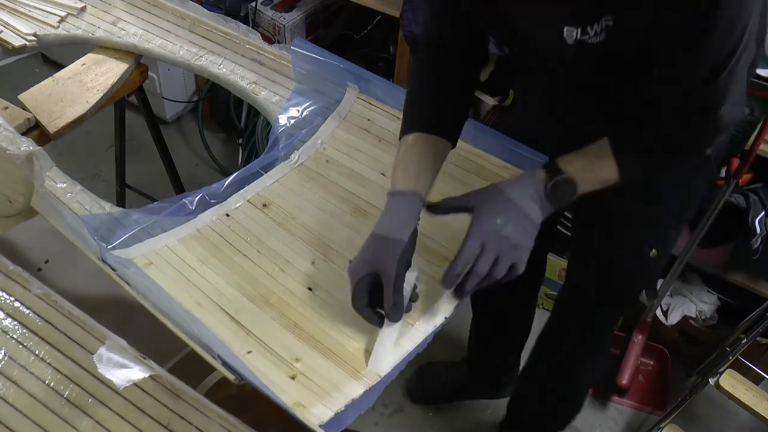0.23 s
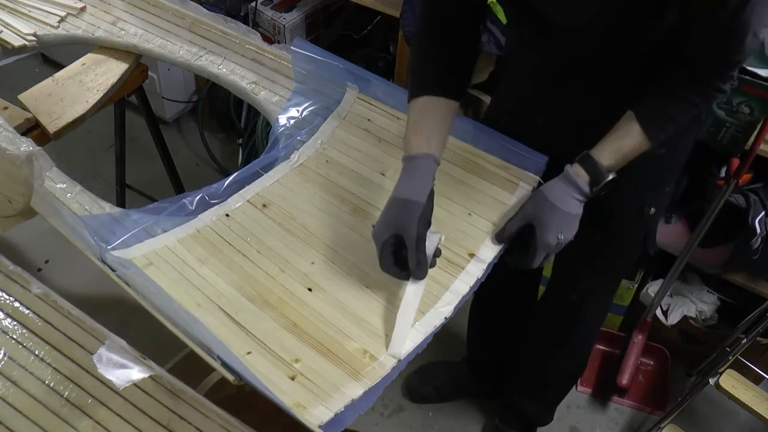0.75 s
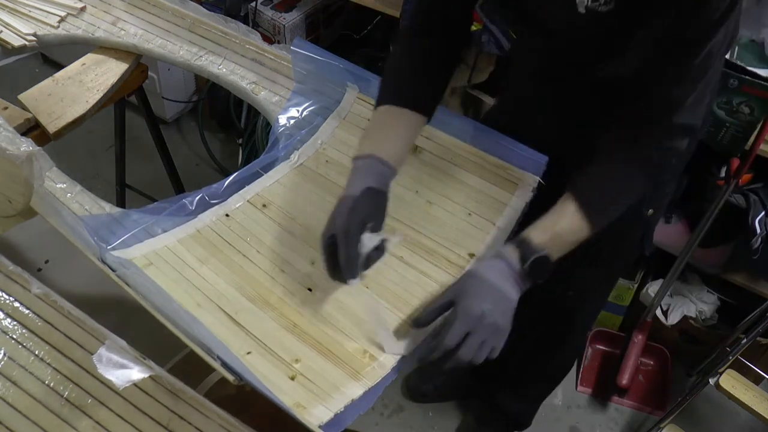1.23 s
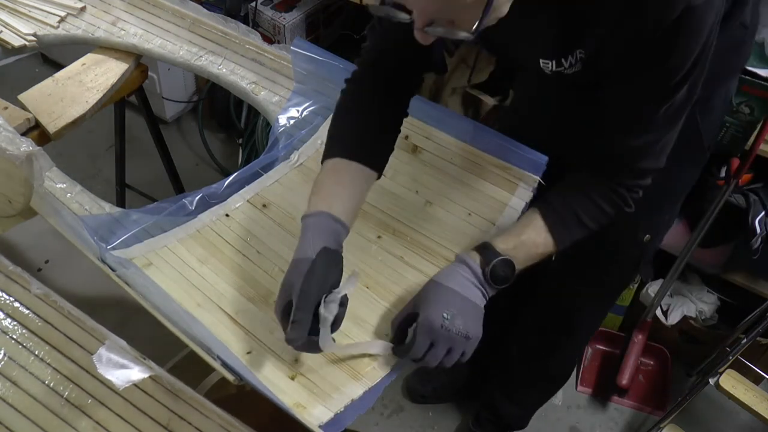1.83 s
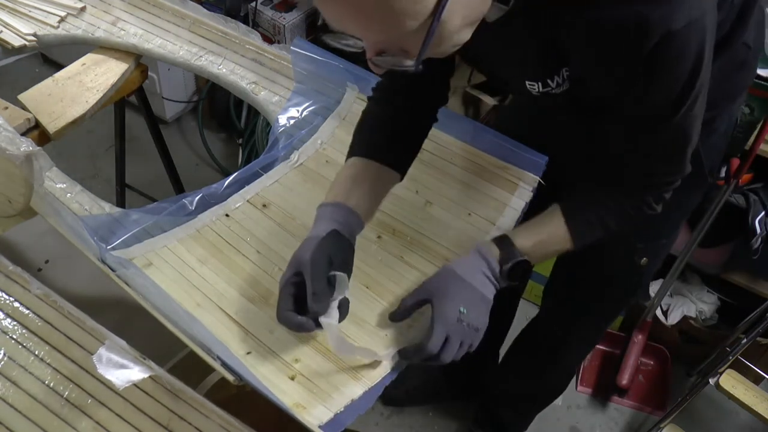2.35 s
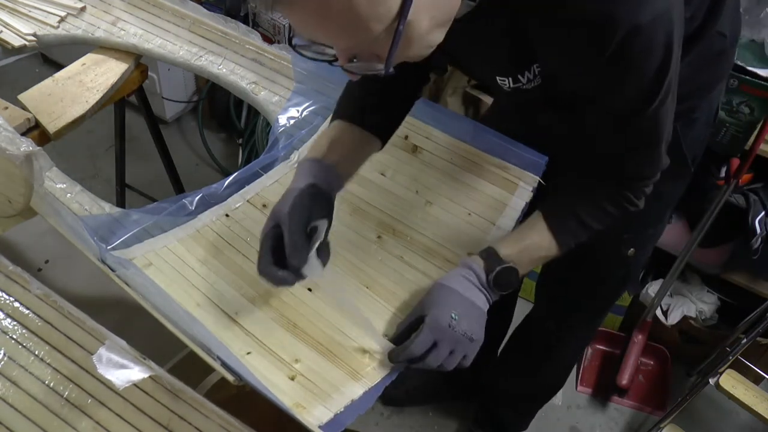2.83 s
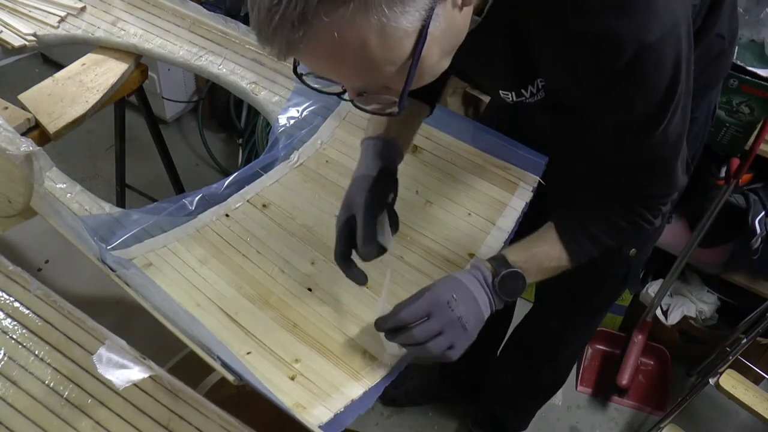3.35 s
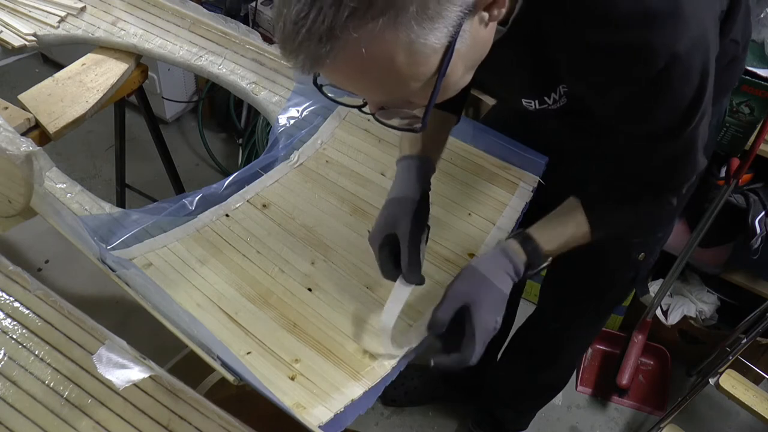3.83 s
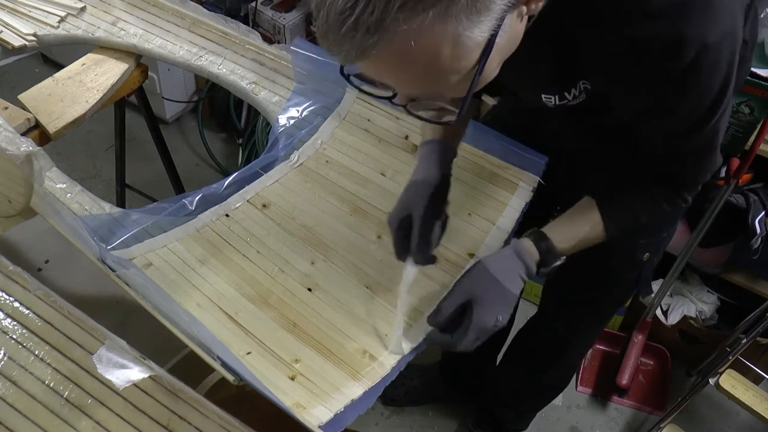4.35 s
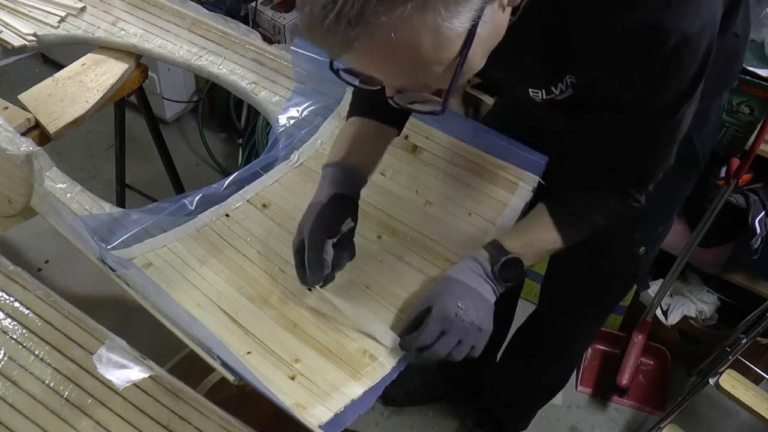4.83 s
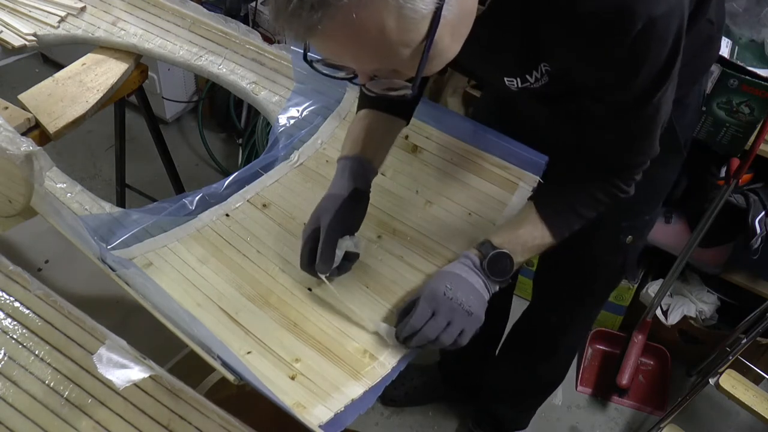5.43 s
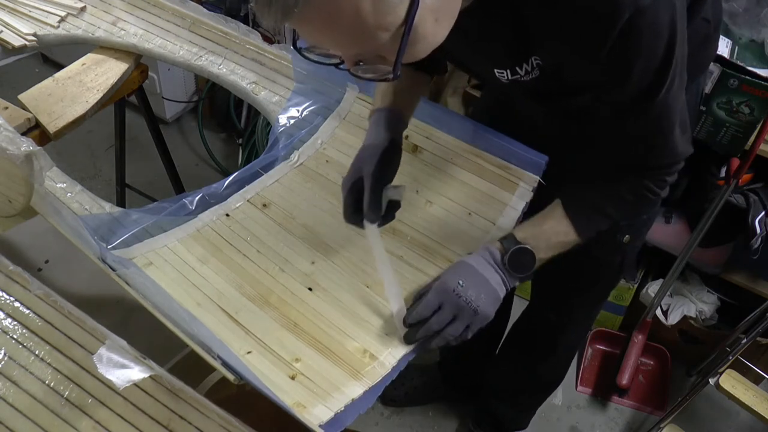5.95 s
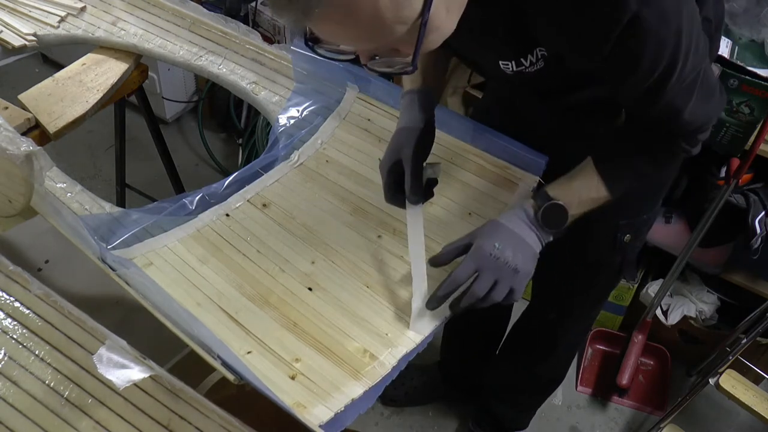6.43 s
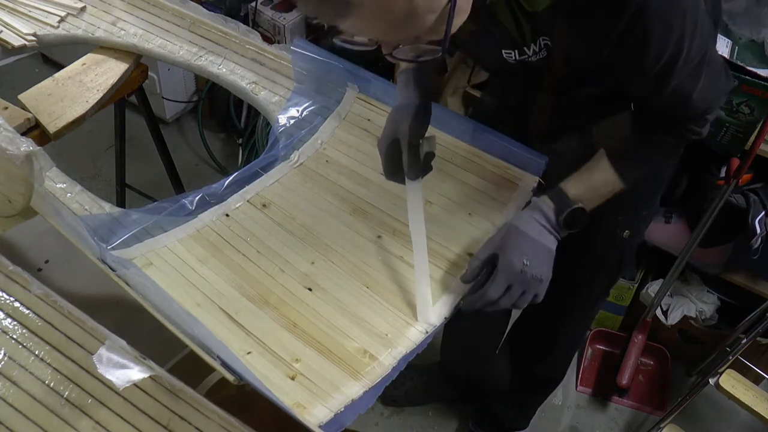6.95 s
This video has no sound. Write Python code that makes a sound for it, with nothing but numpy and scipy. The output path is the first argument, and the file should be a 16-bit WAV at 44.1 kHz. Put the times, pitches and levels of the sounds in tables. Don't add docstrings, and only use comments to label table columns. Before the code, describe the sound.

Dry, bright tape tearing at medium-close range: a jerk and one strong rip, then irregular short rasps, ticks and crinkles with quieter gaps. Sharp snaps break through in the later part. Dull wooden scrapes and thumps accompany the handling. A close bench reflection and short room tail surround everything, with low mains and motor hum and soft, nearly centred hiss.

```python
import sys
import numpy as np
from scipy import signal
from scipy.fft import rfft, irfft
from scipy.io import wavfile
from scipy.ndimage import uniform_filter1d

SR = 44100
rng = np.random.default_rng(int(sys.argv[2]) if len(sys.argv) > 2 else 0)


def rack_gain(trim_db):
    fader = np.asarray(trim_db, float)
    return 10 ** (fader / 20)


def store_wav(level_fs):
    pcm = np.round(np.clip(np.atleast_2d(level_fs), -1, 1) * 32767)
    wavfile.write(sys.argv[1], SR, pcm.T.astype(np.int16))


N = 317079

# start_s, long_tape_db, tautness_db
RIP = [
    (0, -74, -10),
    (0.044, -53, -12),
    (0.052, -43, 1),
    (0.094, -31, -1.5),
    (0.158, -25, 0.5),
    (0.28, -29.5, 4),
    (0.34, -37.5, 3),
    (0.45, -59.5, -0.5),
    (0.6, -81, 1.5),
]
# start_s, long_tape_db, tautness_db
CREEP = [(0, -52, 6), (0.75, -54, 1), (0.89, -66.5, -12), (1.15, -64, -4), (1.6, -60.5, -7),
         (1.95, -58.5, -7), (2.4, -54, -1), (2.62, -61.5, -8), (3.1, -64, -5), (3.5, -68, -2),
         (3.8, -65, -12), (3.95, -82, -8), (4.3, -70, -3), (4.6, -60.5, 1), (5.0, -61, 0.5),
         (5.55, -57, -2), (5.9, -61.5, -4), (6.3, -60, 6), (6.77, -69, -8)]
# peak_s, long_tape_db, rise_s (per 20 dB), fall_s (per 20 dB), tautness_db
SWELLS = [(0.535, -50.5, 0.2, 0.03, 3.5), (0.79, -52.5, 0.5, 0.1, -3.5), (1.004, -48.5, 0.09, 0.09, -1.5),
          (1.228, -40.5, 0.0148, 0.0747, 0.5), (1.45, -51, 0.07, 0.07, -2.5), (1.56, -56.5, 0.15, 0.16, 0),
          (1.748, -46.5, 0.0456, 0.02, 3.5), (1.69, -54, -0.02, 0.18, 6.5), (1.905, -58, -0.04, 0.02, 3),
          (5.15, -48.5, 0.08, .06, -2), (5.27, -52.5, 0.02, 0.16, -2.5), (3.175, -50, -0.02, 0.03, -8),
          (2.81, -61.5, .05, .1, -2), (2.11, -46, 0.12, 0.2, -4), (2.225, -40.5, 0.06, 0.1169, 3),
          (2.345, -57.5, -0.1, 0.15, 4), (2.446, -41.5, -0.18, 0.0829, -1.5),
          (2.804, -58.5, 0.07, 0.08, -1.5), (3.09, -59.5, -0.34, 0.1, -1.5), (3.387, -50, 0, 0.03, -4.5),
          (3.6, -55.5, 0.09, 0.2, -1), (3.674, -53.5, 0, 0.03, 11), (4.2, -49, -0.03, 0, 3),
          (4.73, -46.5, 0.0644, 0.06, -1.5), (5.065, -52, 0.09, 0.08, 1.5), (5.335, -50.5, 0.09, 0.13, -5),
          (6.25, -49.5, 0.06, -1, 6), (6.42, -51.5, 0.21, 0.29, 2), (6.9, -61, 0.1, -1.5, 1.5),
          (7.17, -48.5, 0.23, -2, 1)]
# start_s, long_tape_db, fall_s (per 20 dB), tautness_db
JERKS = [(0.0, -27, 0, -5.5), (0.553, -42.5, 0.04, 6), (0.575, -51, 0.1, 8), (1.2, -45.5, 0.15, -1.5),
         (1.338, -54.5, 0.13, -11), (1.67, -60, 0.35, 6), (2.018, -52.5, 0.2, -1), (2.423, -42.5, 0.07, 5),
         (2.965, -61.5, 1.4, -2.5), (3.163, -56.5, 0.14, 1.5), (3.225, -68, 1.3, 0), (3.513, -68, 0.03, 3),
         (4.12, -48, 0.1, -1), (4.149, -56.5, 0.16, 9), (4.312, -59, 0.2, -6), (4.658, -48.5, 0.08, -6),
         (4.684, -55.5, 0.18, 6.5), (4.846, -60, -0.5, -2.5), (5.14, -52.5, -0.01, 3),
         (5.773, -61, -0.2, -5), (5.965, -61, 2, -1.5), (6.156, -51, -0.05, 3.5), (6.29, -57.5, -0.16, 10),
         (6.095, -59, 0.4, 0), (6.534, -38.5, 0.0853, -2), (6.68, -67, .05, -12), (6.972, -48, -0.36, 0),
         (7.006, -42.5, 0, 1), (7.025, -57, 1, 5.5)]
# peak_s, level_db, rise_s (per 20 dB), fall_s (per 20 dB)
CRINKLES = [(0.5, -41, -5, 0), (0.63, -61, 4, 0.3), (0.79, -55.5, 0.2, 0), (1.135, -58, 0, 0.1),
            (1.31, -55.5, 0.12, -0.39), (1.57, -61, 0.2, 0.3), (1.685, -53, -0.05, 0.23),
            (7.02, -54, 0, .3), (1.73, -47.5, -0.06, 0.09), (2.17, -45.5, 0.02, 0.09),
            (2.795, -63, -0.4, 0.06), (3.14, -62, -0.2, -0.4), (3.33, -70.5, 0, 0.7),
            (3.52, -66, -1.7, 0.5), (4.14, -61, 0, -0.5), (5.94, -67, 0.2, 1.3), (7.18, -52, 0.23, 4)]
# peak_s, level_db, rise_s (per 20 dB), fall_s (per 20 dB)
PRESSES = [(0.2, -55, .3, .3), (0.6, -63, .4, .3), (1.23, -60, .04, .08), (1.47, -66, .08, .1),
           (2.25, -66, .1, .1), (2.45, -56, .04, .06), (4.15, -61, .05, .15), (4.73, -62, .08, .1),
           (6.25, -71, .1, .1), (5.64, -63, .12, .1)]
# low_hz, high_hz
PANEL_MODE_HZ = (716, 792)
# low_hz, high_hz
PART_BANDS = [
    (1500, 4000),
    (4000, 8000),
    (8000, 15500),
    (600, 1500),
]
# pitch_hz, gain_db
COLOUR = [(500, -21.5), (640, -17.5), (760, -9.5), (900, -17.5), (1170, -13), (1600, -12.5), (1720, -4.5),
          (2300, -5), (7300, -7.5), (9350, -9.5), (13300, -17.5), (16000, -31)]
# start_s, strip_db, long_tape_db (over strip), paper_db (over strip)
SNAPS = [(0.0495, -37.5, -2, -11), (0.5517, -39.5, 7, -12), (1.202, -38.5, 0.5, -7), (1.2175, -35, 5, -9),
         (1.5397, -42, -5.5, -10), (2.0165, -40, -12, -2), (2.205, -35.5, -15, 1), (2.427, -46, 2, 7),
         (2.4363, -33.5, -4.5, -9), (2.4462, -28.5, -7, -6), (3.163, -41, -4, -7), (3.5857, -44, -0.5, -11),
         (3.6796, -36, -8, 4.5), (4.1197, -38.5, -1, -7), (4.1889, -37, 0, -13.5), (4.657, -43, 5.5, -10),
         (4.6822, -18.5, -19, -24), (4.7054, -49.5, 13, -7), (4.8446, -46, 2.5, -12.5),
         (5.0254, -42, -10, -2), (5.1367, -36, -1, -6), (5.77, -35, -5.5, -21), (6.0046, -50, 2, 5.5),
         (6.158, -37, -2, -17), (6.243, -41, 4, 4), (6.532, -18, -4.5, -6.5), (6.9685, -52, 6, -2),
         (7.003, -46, 5.5, 6), (7.0662, -46.5, 5, 4), (7.1141, -36, -2, 6.5), (7.0284, -44.5, -11, 13.5),
         (3.031, -58, 11.5, -6)]
# start_s, strip_db, pitch_lean_db (+ is higher)
TICKS = [(0.7565, -38.5, -3.5), (1.735, -46, 2), (1.9001, -50, 1.5), (2.1585, -43, -2), (2.792, -55, -3),
         (3.1724, -46, 0), (3.3625, -48.5, 2), (3.378, -44, -4), (3.4145, -46, -6), (3.556, -46, 3),
         (3.663, -42, 15), (4.18, -41, 4), (4.2048, -45, -4), (4.581, -49.5, -1), (4.7618, -40, -4),
         (4.769, -43, -2), (2.234, -41, 0), (2.04, -46, -4), (2.341, -46, 7), (4.73, -40, -3),
         (4.8969, -45, 5), (4.9657, -60, -3), (5.042, -46.5, 8), (5.073, -38.5, 7.5), (5.1442, -42, 0),
         (5.336, -45, -6), (5.9632, -51, -1.5), (6.103, -41.5, 4), (6.217, -44, 3), (6.252, -42, 3),
         (6.261, -43, 3), (6.423, -45, 2), (6.6775, -46, 5), (7.087, -49.5, 3), (7.156, -40, 13),
         (7.1794, -39, 5), (0.9716, -46, -2), (1.3456, -51, -5), (1.3995, -51, 7), (1.4392, -47, -6),
         (1.6674, -47, 7), (2.0952, -42, -6.5), (2.6412, -57, -8), (3.1504, -50, -5), (3.169, -46, -8),
         (3.227, -52, -1), (3.385, -44, -3), (3.42, -49, -5), (3.7597, -51.5, -7), (4.6297, -53, -7),
         (4.943, -52, -5), (5.0323, -43, 6), (5.1033, -45, -3), (5.15, -45, -6), (5.2263, -50.5, -6),
         (5.268, -47, -9), (5.3285, -47, -8), (5.716, -53, -10), (6.0664, -52, 1), (6.2919, -43.5, -2),
         (6.3927, -45, 8), (7.015, -45, 0), (7.1105, -41, 3), (7.127, -38, 4), (7.187, -40, 2)]
# peak_s, level_db, rise_s (per 20 dB), fall_s (per 20 dB),
# deep_share_db
SHIFTS = [(0.01, -54, .1, .5, -6), (0.14, -49, .3, .4, -7), (0.45, -48.5, .6, .7, -11),
          (0.55, -60, .1, .15, 1), (0.73, -55, .4, .09, -7), (1.24, -64, .06, .1, 2),
          (1.47, -54, .08, .15, -9), (1.78, -56, .2, .2, -2), (2.25, -55, .3, .1, -4),
          (2.37, -61, .1, .05, -11), (2.67, -61, .15, .3, 1), (3.1, -68, .25, .8, -4),
          (3.6, -66, .15, .4, -4), (4.16, -54, .08, .25, -10), (4.75, -54, .13, .25, -10),
          (5.0, -69, .2, .2, -2), (5.6, -66, .4, .4, -3), (6.43, -61, .6, .15, -3),
          (2.442, -50, .04, .1, -1), (6.536, -52, .01, .09, 5), (6.85, -66, .3, .2, -4),
          (7.02, -60, .08, .2, 2), (7.18, -57, .25, .3, -7)]
# pitch_hz, gain_db
BOARD = [(110, -17), (160, -23), (290, -2.5), (390, 1.5), (480, -9), (600, -6.5), (700, -26)]
# pitch_hz, level_db (per Hz)
HISS = [(30, -108), (60, -101), (130, -103), (220, -104), (340, -102), (600, -107), (780, -104),
        (950, -116), (1560, -109), (1760, -99), (3000, -102), (5000, -109), (9000, -112), (16000, -121)]
# pitch_hz, level_db (rms), phase_rad
HUM = [(50.01, -76, 0), (100.02, -71.2, 1.6), (99.0, -71.9, 2.3), (150.03, -82, 1), (200.05, -84, .26),
       (300.06, -84, 1.48), (346.5, -86, 2.5)]
# pitch_hz, difference_db (over centre)
WIDTH = [(40, -10), (100, -18), (200, -10), (400, -10), (900, -13), (3000, -17), (5500, -23), (7400, -41),
         (7700, -15), (9000, -13), (9400, -28), (16000, -26)]

SLIPS_PER_S, SLIP_COLOUR_DB, UNEVEN_DB, JUDDER_DB = 5000, 3.5, 0, 1.4
JERK_RISE_S = 0.009
PAPER_DB, PAPER_PER_TAUT, PANEL_DB = -7.5, 1.12, -12.5
TICK_LONG_DB, TICK_PAPER_DB = -7.5, -9
BENCH_S, BENCH_DB = 0.0039, -8.5
SNAP_ECHO_DB = 3.5
ROOM_T60_S, ROOM_TREBLE_T60_S, ROOM_DB = 0.24, 0.21, -5
TOP_HZ = 15800


def peeling():
    parts_db = pull()
    long_db = parts_db[0]
    share = np.clip(SLIPS_PER_S / SR * rack_gain(0.45 * (long_db + 50.5)), 0.04, 0.8)
    uneven_db = UNEVEN_DB * (1 - share)
    slips = (rng.random(N) < share) * rng.standard_normal(N) / np.sqrt(share)
    slips = slips * rack_gain(uneven_db * (np.minimum(rng.exponential(size=N), 3) - 3.3))
    slips = slips * rack_gain(JUDDER_DB * (1 - share) * walk(45))
    out = 0
    for k in range(4):
        part = ring(slips * rack_gain(SLIP_COLOUR_DB * rng.standard_normal(N)), k)
        out = out + unit(part) * rack_gain(parts_db[k])
    return out + singing_panel()


def pull():
    rows = SWELLS + [(s, db, JERK_RISE_S, fall_s, taut) for s, db, fall_s, taut in JERKS]
    efforts = [(swell(*row[:-1]), row[-1]) for row in rows]
    for way in (RIP, CREEP):
        efforts.append((rack_gain(2 * curve(column=1, table=way)), curve(column=2, table=way)))
    long = sum(power for power, _ in efforts)
    strip = sum(power * rack_gain(2 * taut) for power, taut in efforts)
    paper = sum(power * rack_gain(2 * (PAPER_DB + PAPER_PER_TAUT * taut)) for power, taut in efforts)
    paper = paper + sum(swell(*row) for row in CRINKLES)
    panel = long * rack_gain(2 * PANEL_DB)
    return 10 * np.log10([long, strip, paper, panel])


def swell(s, db, rise_s, fall_s):
    t = np.arange(0, N + 32, 32) / SR - s
    climb = np.clip(-t / max(rise_s, 0.004), -9, 9)
    ease = np.clip(t / max(fall_s, 0.004), -9, 9)
    power = 2 * rack_gain(2 * db) / (rack_gain(2 * 20 * climb) + rack_gain(2 * 20 * ease))
    return np.interp(np.arange(N) / SR - s, t, power)


def ring(clicks, k):
    return band(colour(clicks, COLOUR), PART_BANDS[k], order=3)


def singing_panel():
    sing = unit(band(rng.standard_normal(N), PANEL_MODE_HZ))
    return sing * np.sqrt(sum(swell(*row) for row in PRESSES))


def snaps():
    ticks = [(s, db, TICK_LONG_DB - lean, TICK_PAPER_DB + lean) for s, db, lean in TICKS]
    rows = np.array(SNAPS + ticks)
    start_s, strip_db, long_db, paper_db = rows.T
    at = (start_s[:, None] * SR).astype(int) + np.arange(64)
    burst = rng.standard_normal((len(rows), 64)) * np.exp(-np.arange(64) / SR / 0.0013)
    burst[:len(SNAPS), 0] = 6.0
    burst[len(SNAPS):, 0] = 2.5
    burst = burst / np.sqrt(np.sum(burst ** 2, axis=1, keepdims=True))
    pulse = (np.arange(N) == 0) * 1.0
    out = 0
    for k, part_db in enumerate((long_db, 0, paper_db, long_db - 17.0)):
        db = strip_db + (0 if k == 1 else part_db)
        if k == 0:
            db = strip_db + long_db
        clicks = np.zeros(N + 64)
        np.add.at(clicks, at, burst * rack_gain(db + 8.5)[:, None])
        out = out + ring(clicks[:N], k) / abs(ring(pulse, k)).max()
    blows = np.zeros(N)
    blows[at[:, 0]] = rack_gain(strip_db + long_db - 8.5)
    return out + colour(blows, BOARD) / abs(colour(pulse, BOARD)).max()


def rumble():
    efforts = [swell(*row[:-1]) for row in SHIFTS]
    deep = sum(power * rack_gain(2 * row[-1]) for power, row in zip(efforts, SHIFTS))
    knocks = rng.standard_normal((2, N)) * rack_gain(2.0 * walk(25))
    board = unit(colour(knocks[0], BOARD))
    trestle = unit(band(knocks[1], (75, 185)))
    return np.sqrt(sum(efforts)) * board * rack_gain(-2.5) + np.sqrt(deep) * trestle


def bench_echo(tape, breaks):
    lag = np.round(SR * (BENCH_S + 0.00014 * walk(4)))
    source = tape + breaks * (rack_gain(SNAP_ECHO_DB) - 1)
    return np.interp(np.arange(N) - lag, np.arange(N), source, left=0) * rack_gain(BENCH_DB)


def room(x):
    turn = 2 * np.pi * 1.3 * np.arange(N) / SR
    return sum(signal.fftconvolve(x * w, tail())[:N] for w in (np.cos(turn), np.sin(turn)))


def tail():
    t = np.arange(int(0.6 * SR)) / SR
    low = band(rng.standard_normal(len(t)), (60, 5000), order=1) * rack_gain(-60 * t / ROOM_T60_S)
    high = band(rng.standard_normal(len(t)), (5000, 18000), order=1) * rack_gain(-60 * t / ROOM_TREBLE_T60_S)
    response = (low + 1.38 * high) * np.clip((t - 0.004) / 0.00069, 0, 1)
    return response / np.sqrt(np.sum(response ** 2))


def workshop():
    density = np.sqrt(SR / 2)
    mid, side = (colour(rng.standard_normal(N), HISS) * density * rack_gain(0.5 * walk(3.42)) for _ in range(2))
    t = np.arange(N) / SR
    hum = sum(np.sqrt(2) * rack_gain(db) * np.cos(2 * np.pi * hz * t + rad) for hz, db, rad in HUM)
    return mid + hum, side * rack_gain(2.5)


def curve(column, table):
    table = np.array(table)
    return np.interp(np.arange(N) / SR, table[:, 0], table[:, column])


def unit(x):
    return x / np.sqrt(np.mean(x ** 2))


def colour(x, points):
    hz, db = np.transpose(points)
    grid = np.arange(2049) * SR / 4096 + 1
    log_gain = np.log(rack_gain(np.interp(np.log(grid), np.log(hz), db)))
    cep = irfft(log_gain)
    cep[1:2048] *= 2
    cep[2049:] = 0
    return signal.fftconvolve(x, irfft(np.exp(rfft(cep))))[:N]


def band(x, edges_hz, order=2):
    return signal.sosfilt(signal.butter(order, edges_hz, "band", fs=SR, output="sos"), x)


def walk(rate):
    k = int(SR / rate)
    steps = np.repeat(rng.standard_normal(N // k + 1), k)
    return unit(uniform_filter1d(steps, k)[:N])


def scene():
    peel = peeling() * rack_gain(-2.5)
    breaks = snaps()
    tape = peel + breaks + rumble() * rack_gain(-3.0)
    echo = bench_echo(tape, breaks)
    air_mid, air_side = workshop()
    mid = tape + echo + rack_gain(ROOM_DB) * room(tape) + air_mid
    side = colour(room(tape) + 0.6 * echo + air_side, WIDTH)
    side = side - 0.022 * mid
    return np.array([mid + side, mid - side])


def top_cut(x):
    return signal.sosfilt(signal.butter(12, 16250, fs=SR, output="sos"), x)


def record(dry):
    mix = signal.sosfilt(signal.ellip(8, 0.2, 70, TOP_HZ, fs=SR, output="sos"), dry)
    return top_cut(mix)


dry = scene()
out = record(dry)
store_wav(out)
```